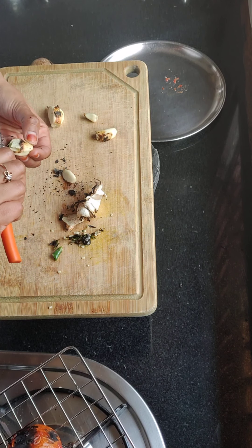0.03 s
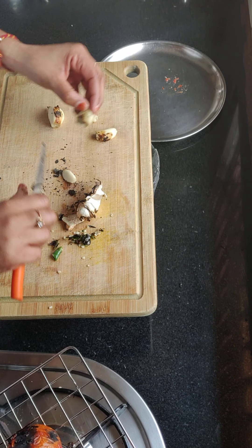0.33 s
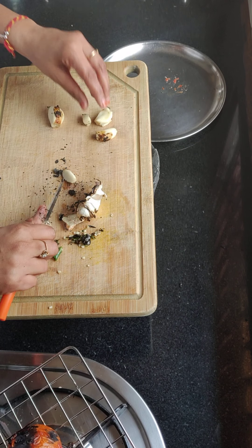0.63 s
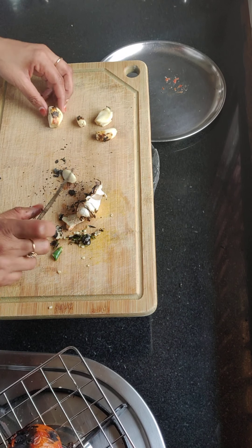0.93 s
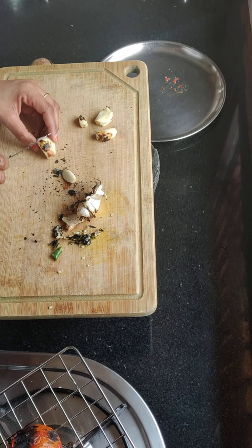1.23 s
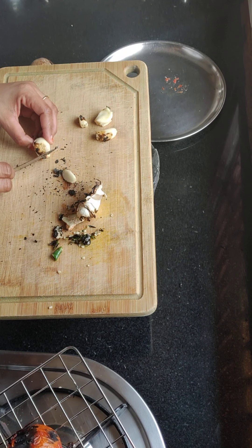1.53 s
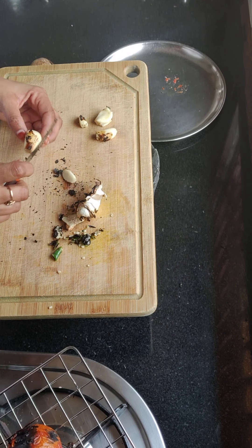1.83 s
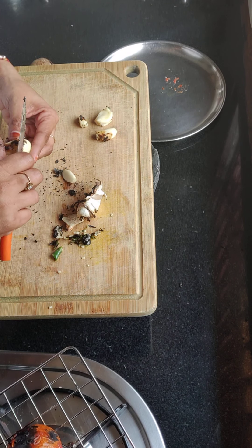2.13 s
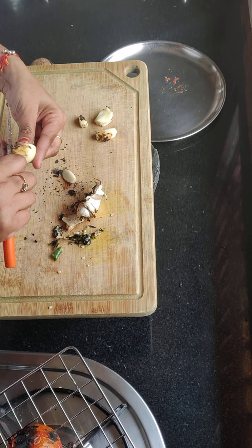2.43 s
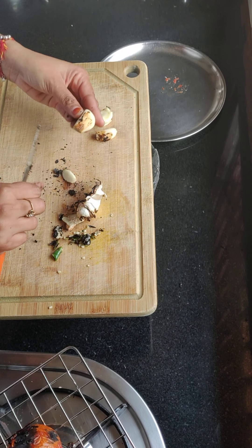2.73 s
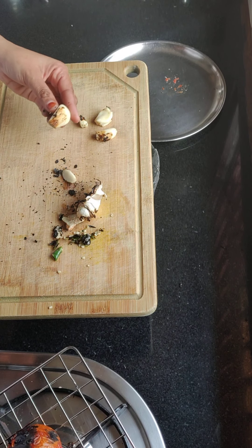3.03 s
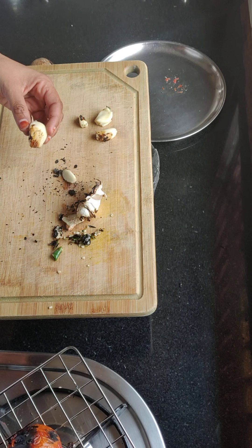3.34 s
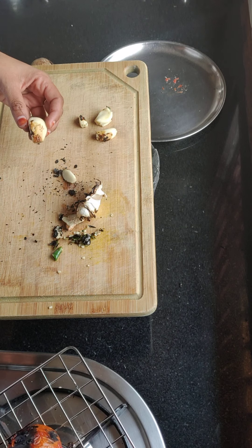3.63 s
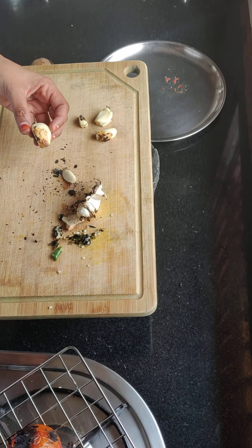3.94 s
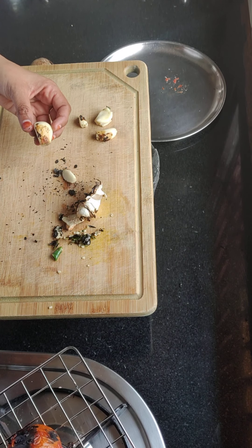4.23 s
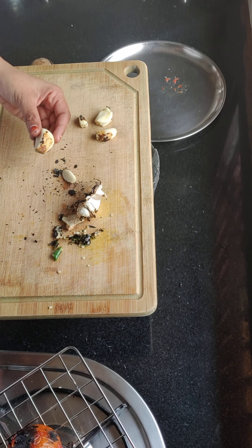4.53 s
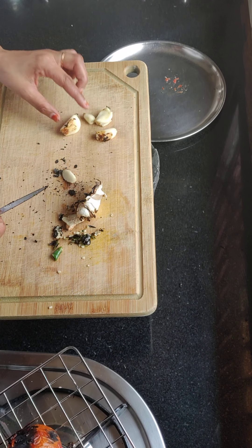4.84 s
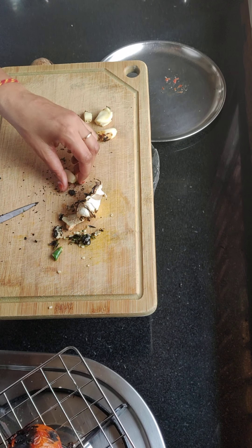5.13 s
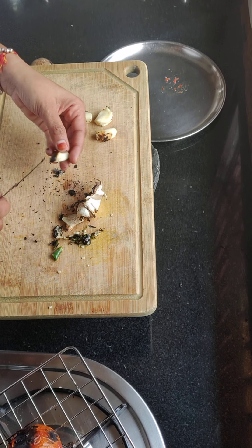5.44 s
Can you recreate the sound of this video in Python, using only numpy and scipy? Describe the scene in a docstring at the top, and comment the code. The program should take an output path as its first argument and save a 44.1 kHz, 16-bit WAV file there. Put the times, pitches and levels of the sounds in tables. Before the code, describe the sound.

Roasted garlic is peeled on a wooden board in a small kitchen, heard through one phone microphone over steady, low room noise. From the start, fingers rub the papery skin in faint, short, crackly rustles, and a soft push rocks the board at about 1 second. Around 1.7 to 1.9 seconds a small knife scrapes the skin in quick strokes and bumps the board with knocks and dull thuds. Another short scrape and a heavier thud come at 2.4 seconds. After a lull, a light tap at 3.4 seconds leads into whispering dry skin. At about 4.1 seconds the knife is put down with a tick and a sharp knock, the loudest moment, ringing briefly off the counter and walls. A last scrape follows at 4.4 seconds, then soft thuds between 4.7 and 5.3 seconds. A very faint, thin high tone swells and fades around 5 seconds.

```python
"""Roasted garlic peeled on a wooden board in a small kitchen, heard by one phone microphone.
Fingers rub the papery skin from the start; from 1 s soft pushes rock the board. At 1.7-2.4 s a small
knife scrapes skin off in short strokes and bumps the board. From 3.4 s dry skin whispers as cloves are
moved. At 4.1 s the knife is put down with a tick and a sharp knock. A last scrape, soft thuds and a
faint thin tone follow. Counter and walls answer at once, over steady room noise."""
import sys
import numpy as np
from scipy import signal
from scipy.fft import rfft, irfft, next_fast_len
from scipy.io import wavfile
from scipy.ndimage import map_coordinates

SR = 44100
rng = np.random.default_rng(int(sys.argv[2]) if len(sys.argv) > 2 else 0)


def generate_wav(sig):
    """Save sig (samples, or channels by samples) to the path in sys.argv[1] as 16-bit PCM at SR."""
    pcm = np.round(np.clip(np.atleast_2d(sig).T, -1, 1) * 32767).astype(np.int16)
    wavfile.write(sys.argv[1], SR, pcm)


N = 246947

# Event levels are relative within each table.
# fingers rubbing the clove: t/s, length/s, crackle level/dB, body re crackle/dB
RUBS = [(-.1, .2, -49, -3), (0.233, 0.11, -56.5, 0.5), (0.476, 0.12, -55, -0.5), (0.808, 0.12, -61, 2),
        (0.965, 0.18, -60, 2.5), (1.097, 0.34, -52, -2.5), (1.518, 0.13, -58.5, -3),
        (1.892, 0.21, -58, 1.5), (2.214, 0.24, -60.5, -4.5), (2.442, 0.16, -63, 1), (3.376, 0.2, -64, 1.5),
        (3.7, 0.5, -70, 0.5), (4.242, 0.19, -58.5, -0.5)]
# papery skin: f/Hz, level/dB
SKIN_SPECTRUM = [(700, -22), (1500, -1), (2500, -4.5), (4000, -2), (5300, -4.5), (6300, 1.5), (8000, -5.5),
                 (11000, -9.5), (15500, -12)]
# dull rub of clove and hand: f/Hz, level/dB
BODY_SPECTRUM = [(40, -37), (80, -35), (140, 4.5), (280, 0.5), (380, -1.5), (520, -1.5), (1100, -2.5),
                 (1500, -4.5), (2200, -7), (3200, -16), (6000, -31)]
# room noise: f/Hz, level/dB
ROOM_SPECTRUM = [(20, -34), (45, -9), (80, 3.5), (130, -6.5), (220, -7.5), (330, -15.5), (510, -9.5),
                 (700, -23.5), (1050, -19.5), (1500, -24.5), (3000, -30.5), (5000, -35.5), (6400, -26.5),
                 (8500, -36), (15500, -36.5)]
# kitchen decay: f/Hz, t60/s
ROOM_DECAY = [(150, 0.68), (1000, 0.25), (4000, 0.22), (14000, 0.38)]
# hand and clove pushing the board: t/s, level/dB, f/Hz
THUDS = [(1.065, -50, 197), (1.694, -44, 181), (1.72, -38, 181), (1.765, -39, 186), (1.877, -39, 164),
         (2.357, -42, 176), (2.377, -28, 171), (2.403, -38, 134), (4.685, -46.5, 406), (4.692, -44, 182.6),
         (4.831, -50.5, 188), (5.262, -50.5, 87.5)]
# knife strokes: t/s, length/s, level/dB, grip slope/(dB/s), body below 2 kHz/dB, bright band/dB
STROKES = [(1.686, 0.079, -56, 168, -13, -1.5), (1.768, 0.098, -32, -101, -2, 2.5),
           (2.366, 0.038, -39.5, -20, 2.5, .5), (4.368, 0.033, -43, -90, -4.5, 9)]
# edge on skin: f/Hz, level/dB
SCRAPE_SPECTRUM = [(100, -5), (250, 6.5), (600, 1), (1200, 1.5), (2500, 1), (3300, -3), (4500, -0.5),
                   (6100, -0.5), (7500, -3.5), (8500, -6.5), (12000, -12), (15500, -12)]
# blade and handle on the board: t/s, level/dB, hardness/Hz, ring re crack/dB, low-band crack t60/s
KNOCKS = [(1.701, -47, 1500, -7, 0.18), (1.722, -33.5, 1700, -16, 0.17), (1.875, -31, 1650, -29, 0.56),
          (2.058, -45.5, 1915, -11, .41), (2.392, -40, 1800, -1.5, 0.12), (3.37, -50, 3420, -16, 0.33),
          (4.056, -36, 14000, -5, 0.64), (4.144, -28, 903, -6, .03), (4.150, -22.5, 3970, 2, 0.27)]
# crack of a contact: f/Hz, level/dB
CRACK_SPECTRUM = [(100, -21), (250, 1.5), (500, -1), (1050, 1.5), (1500, -2.5), (2100, -1), (3100, -4.5),
                  (4300, -10.5), (5900, -5), (7500, -7.5), (9000, -10.5), (13500, -6), (15500, -8)]
# modes of the board on its counter: f/Hz, level/dB, t60/s
BOARD_MODES = [(224, -4.5, 0.099), (283, -9.5, 0.46), (335, -7.5, 0.55), (453, -7, 0.59), (501, -7, 0.63),
               (556.7, 3, 0.16), (580, 8.5, 0.11), (855, 3, 0.14), (1060, 3, 0.13), (1127, -1.5, 0.16),
               (1240, -3.5, 0.28), (1575, -2, .2), (1720, -4, 0.24), (1892, 5, 0.25), (2050, -4, 0.44),
               (2120, -4.5, 0.32), (2555, -12, 0.16), (2656, -9, 0.22), (2930, -5, 0.11)]
# dry skin as the peeled clove is carried over and the next fetched: t/s, level/dB
CARRYING = [(3.4, -85), (3.7, -81), (4.3, -62), (4.6, -71), (5.0, -70.5), (5.6, -75)]
# thin background tone: t/s, level/dB
WHISTLE_SWELL = [(4.85, -95), (5.0, -73.5), (5.12, -69.5), (5.3, -85), (5.4, -87)]
# dips of the microphone's sound path: f/Hz, width/Hz, gain/dB
MIC_DIPS = [(399, 47, -5.5), (751, 99, -11.5), (1390, 115, -4.5), (1833, 83.5, -28.5), (2322, 57, -27),
            (2747, 46, -6.5), (3596, 68, -25), (5100, 255, -11.5), (8030, 100, -9)]
# microphone hiss: f/Hz, level/dB
HISS_SPECTRUM = [(30, 10.0), (750, 15), (2500, 2.5), (5000, -3.0), (9000, -4.0), (15500, -8)]

RUB_SWELL_SHARE, RUB_FADE_DB_PER_S = 0.58, 54
BRIGHT_HZ, BRIGHT_WIDTH_HZ = 6600, 1130
THUD_T60_CYCLES, THUD_RISE_S = 34, 0.0016
BITE_S, LIFT_DB_PER_S = 0.026, 192  # edge digs in, lifts off
KNOCK_RISE_CYCLES = 5.0  # periods of the hardness frequency
BAND_LIMIT_HZ = 15750


def amp(db):
    """dB to gain."""
    return 10 ** (np.asarray(db) / 20)


def unit(x):
    """x at rms 1."""
    return x / np.sqrt(np.mean(x ** 2) + 1e-20)


def along(points, hz):
    """(f/Hz, value) points read on a log axis."""
    knots_hz, values = np.transpose(points)
    return np.interp(np.log(hz + 1), np.log(knots_hz + 1), values)


def envelope(points):
    """Gain per sample from (t/s, level/dB) points; zero outside them."""
    times_s, db = np.transpose(points)
    return amp(np.interp(np.arange(N) / SR, times_s, db, left=-np.inf, right=-np.inf))


def filtered(x, gain):
    """Zero-phase filter with response gain(hz)."""
    size = next_fast_len(len(x) + 8192)
    return irfft(rfft(x, size) * gain(np.fft.rfftfreq(size, 1 / SR)), size)[:len(x)]


def coloured(x, gain_db, size=8192):
    """Minimum-phase filter with response gain_db(hz)."""
    hz = np.fft.rfftfreq(size, 1 / SR)
    cepstrum = irfft(np.log(amp(gain_db(hz)) + 1e-6))
    cepstrum[1:size // 2] *= 2
    cepstrum[size // 2 + 1:] = 0
    impulse = irfft(np.exp(rfft(cepstrum)))
    return signal.fftconvolve(x, impulse)[:len(x)]


def shaped(x, spectrum):
    """x coloured by a spectrum table, at rms 1."""
    return unit(coloured(x, lambda hz: along(spectrum, hz)))


def wobble(rate_hz):
    """Smooth random curve, rate_hz knots a second."""
    knots = rng.standard_normal(int(N * rate_hz / SR) + 4)
    return map_coordinates(knots, [np.arange(N) * rate_hz / SR])


def gesture(start_s, length_s, rise_s, slope_db_per_s, fade_db_per_s):
    """Gain of one hand movement: swell, drift until length_s, fade."""
    t = np.arange(N) / SR - start_s
    swell = np.sin(np.pi / 2 * np.clip(t / rise_s, 0, 1))
    drift_db = slope_db_per_s * np.maximum(np.minimum(t, length_s) - rise_s, 0)
    fade_db = fade_db_per_s * np.maximum(t - length_s, 0)
    return swell * amp(drift_db - fade_db)


def crackle(rate_hz, smear):
    """Tiny fractures of uneven size; nearby surfaces smear a share into hiss."""
    sizes = amp(3 * np.clip(rng.standard_normal(N), -2, 2))
    snaps = (rng.random(N) < rate_hz / SR) * rng.choice([-1, 1], N) * sizes
    return unit(unit(snaps) + smear * rng.standard_normal(N))


def bright_band(hz):
    """Narrow band near 6.6 kHz that the microphone path emphasises in scrapes and rustle, 0 to 1."""
    return np.exp(-((hz - BRIGHT_HZ) / BRIGHT_WIDTH_HZ) ** 2)


def rub_gains():
    """Skin and body gains as fingers press and ease; overlapping rubs add in power."""
    skin_power, body_power = np.zeros((2, N))
    for start_s, length_s, db, body_db in RUBS:
        pressure = amp(db) * gesture(start_s, length_s, RUB_SWELL_SHARE * length_s, 0, RUB_FADE_DB_PER_S)
        skin_power += pressure ** 2
        body_power += (amp(body_db) * pressure) ** 2
    return np.sqrt(skin_power), np.sqrt(body_power)


def fingers():
    """Papery skin rustles over the duller rub of clove and hand, and whispers when carried."""
    skin_gain, body_gain = rub_gains()
    grip = amp(0.41 * wobble(rate_hz=35))
    skin = skin_gain * shaped(crackle(rate_hz=3000, smear=1.54), SKIN_SPECTRUM)
    body = body_gain * shaped(crackle(rate_hz=900, smear=1.64), BODY_SPECTRUM)
    whisper_db = lambda hz: along(SKIN_SPECTRUM, hz) + 7 * bright_band(hz)
    whisper = unit(coloured(crackle(rate_hz=1100, smear=1.3), whisper_db))
    return grip * (amp(-0.17) * skin + amp(0.76) * body + envelope(CARRYING) * whisper)


def room_noise():
    """Steady, mostly low background noise."""
    return amp(-60.5) * shaped(rng.standard_normal(N), ROOM_SPECTRUM)


def room_tail(x):
    """Diffuse kitchen tail; each frequency decays at its own rate."""
    hz, t, bins = signal.stft(rng.standard_normal(SR // 2), SR, nperseg=256)
    decay = amp(-60 * t / along(ROOM_DECAY, hz)[:, None])
    _, tail = signal.istft(bins * decay, SR, nperseg=256)
    return signal.fftconvolve(x, tail / np.linalg.norm(tail))[:N]


def thuds():
    """Soft contacts rock the whole board: a low, damped swing with a rough rumble."""
    out, t = np.zeros(N + SR), np.arange(SR // 2) / SR
    for start_s, db, hz in THUDS:
        t60_s = THUD_T60_CYCLES / hz
        spectrum = [(hz / 6, -14), (hz / 2, -7), (hz, 0), (hz * 1.14, -3), (hz * 3, -20), (hz * 8, -50)]
        rumble = shaped(rng.standard_normal(len(t)), spectrum)
        swing = np.sin(2 * np.pi * hz * t) + 0.57 * rumble
        attack = 1 - np.exp(-t / THUD_RISE_S)
        out[round(start_s * SR):][:len(t)] += amp(db - 60 * t / t60_s) * attack * swing
    return out[:N]


def scrapes():
    """The edge catches and slips, breaking charred skin in dense bursts."""
    out = np.zeros(N)
    for start_s, length_s, db, slope_db_per_s, body_db, bright_db in STROKES:
        force = amp(db) * gesture(start_s, length_s, BITE_S, slope_db_per_s, LIFT_DB_PER_S)
        shelf_db = lambda hz: body_db / (1 + (hz / 2000) ** 2)
        colour_db = lambda hz: along(SCRAPE_SPECTRUM, hz) + shelf_db(hz) + bright_db * bright_band(hz)
        catching = amp(0.48 * wobble(rate_hz=130))
        out += force * catching * unit(coloured(crackle(rate_hz=3500, smear=1.4), colour_db))
    return amp(2.0) * out


def scatter(t, t60_s, reach_s):
    """Envelope of dense reflections off counter and near walls; thins fast after reach_s."""
    return amp(-60 * t / t60_s) / np.sqrt(1 + (t / reach_s) ** 8)


def crack(t, hardness_hz, t60_s):
    """Contact noise: duller when soft; the band above 7.7 kHz dies sooner."""
    low_share = lambda hz: 1 / (1 + (hz / 7700) ** 12)
    low, high = rng.standard_normal((2, len(t)))
    low = filtered(low * scatter(t, t60_s, reach_s=0.062), lambda hz: np.sqrt(low_share(hz)))
    high = filtered(high * scatter(t, 0.36 * t60_s, reach_s=0.093), lambda hz: np.sqrt(1 - low_share(hz)))
    colour_db = lambda hz: along(CRACK_SPECTRUM, hz) - 10 * np.log10(1 + (hz / hardness_hz) ** 2)
    return unit(coloured(low + high, colour_db))


def board_ring(t):
    """Damped board modes; level and phase vary per strike."""
    ring = np.zeros(len(t))
    for hz, db, t60_s in BOARD_MODES:
        gain = amp(db + rng.normal(0, 1)) * scatter(t, t60_s, reach_s=0.048)
        ring += gain * np.sin(2 * np.pi * (hz * t + rng.random()))
    return unit(ring)


def knocks():
    """Each knife contact cracks and rings the board; softer ones rise slower."""
    out, t = np.zeros(N + SR), np.arange(SR // 3) / SR
    for start_s, db, hardness_hz, ring_db, t60_s in KNOCKS:
        strike = crack(t, hardness_hz, t60_s) + amp(ring_db) * board_ring(t)
        attack = 1 - np.exp(-t * hardness_hz / KNOCK_RISE_CYCLES)
        out[round(start_s * SR):][:len(t)] += amp(db - 12.5) * attack * strike
    return out[:N]


def whistle(hz=2645):
    """A faint, thin tone swells and fades in the background."""
    phase_rad = 2 * np.pi * hz * np.arange(N) / SR + 0.62 * wobble(rate_hz=45)
    return envelope(WHISTLE_SWELL) * np.sin(phase_rad)


def scene():
    """Handling, room tail, whistle and room noise, alike in both channels."""
    handling = fingers() + scrapes() + knocks() + thuds()
    background = room_noise()
    mono = handling + amp(-14) * room_tail(handling) + whistle() + background
    return np.array([mono, mono])


def record(dry):
    """Microphone: narrow dips from its sound path, faint hiss, band limit."""
    def dips_db(hz):
        return sum(db / (1 + ((hz - dip_hz) / width_hz) ** 2) ** 2 for dip_hz, width_hz, db in MIC_DIPS)

    hiss = amp(-75.5) * shaped(rng.standard_normal(N), HISS_SPECTRUM)
    return np.array([filtered(coloured(x, dips_db) + hiss, lambda hz: hz < BAND_LIMIT_HZ) for x in dry])


dry = scene()
out = record(dry)
generate_wav(out)
```